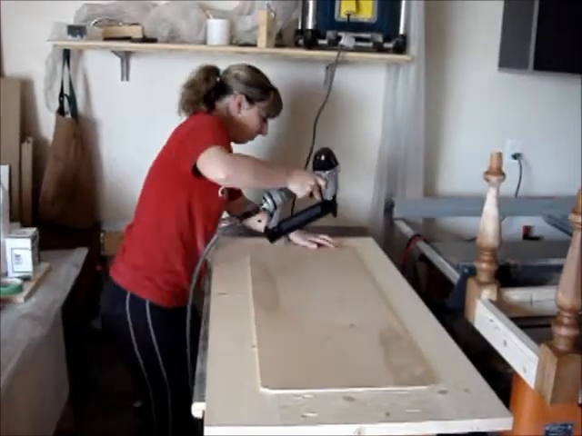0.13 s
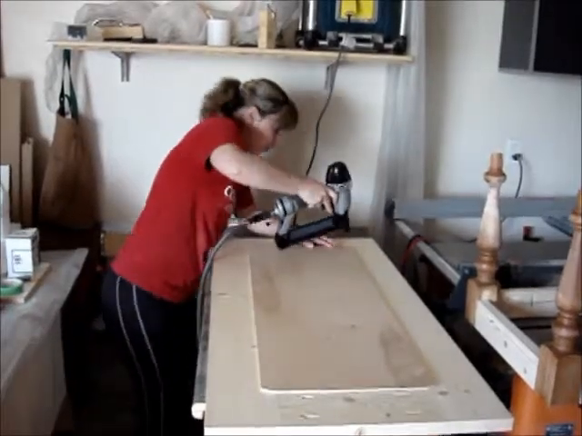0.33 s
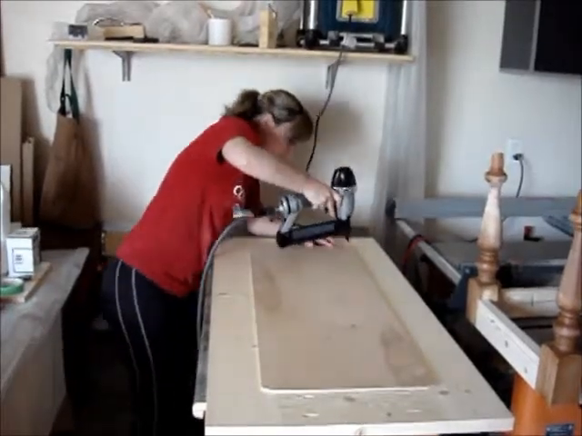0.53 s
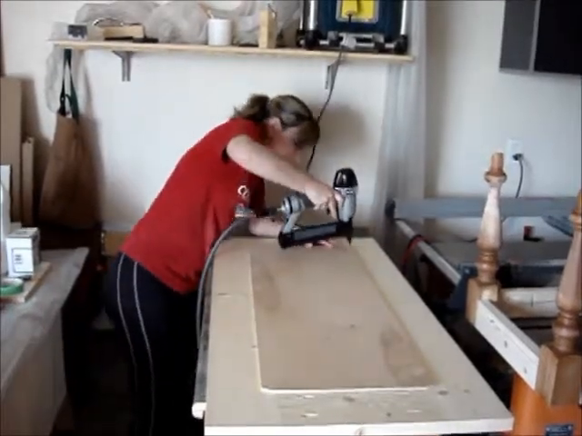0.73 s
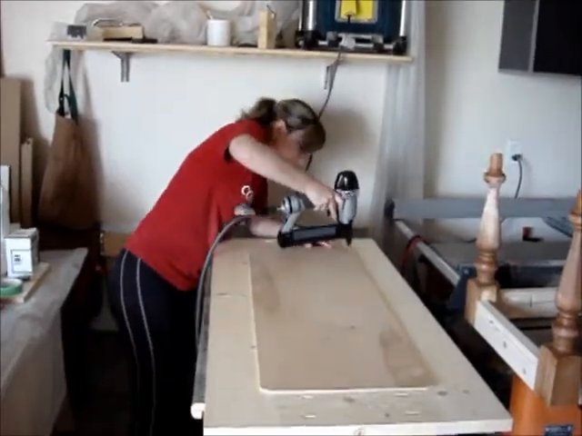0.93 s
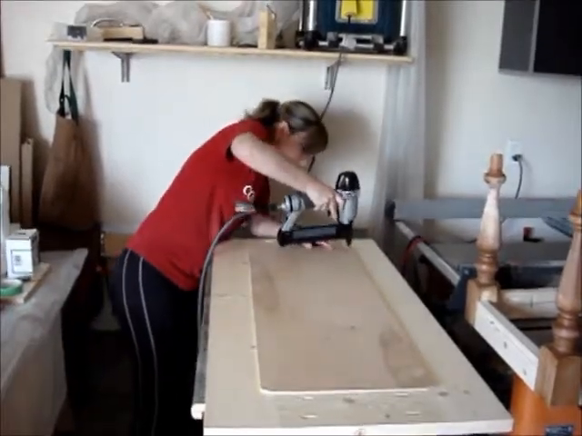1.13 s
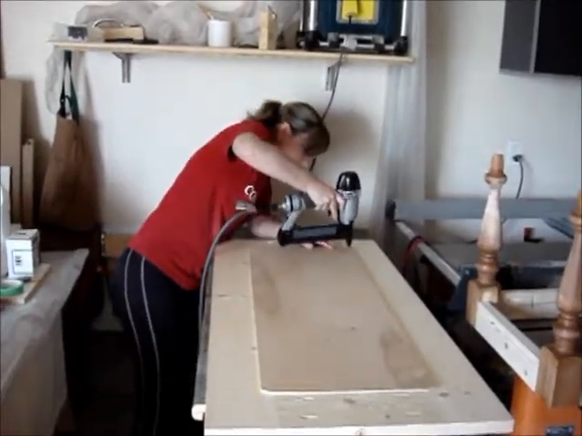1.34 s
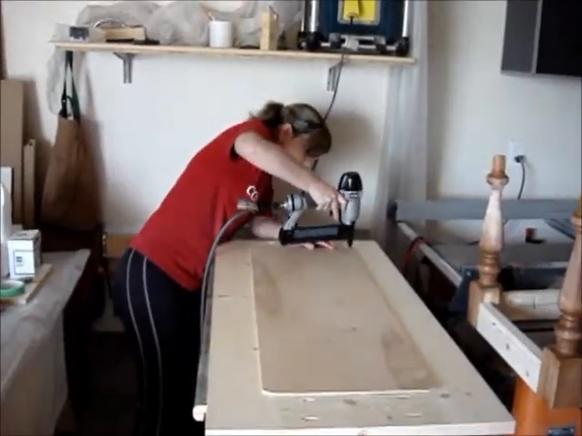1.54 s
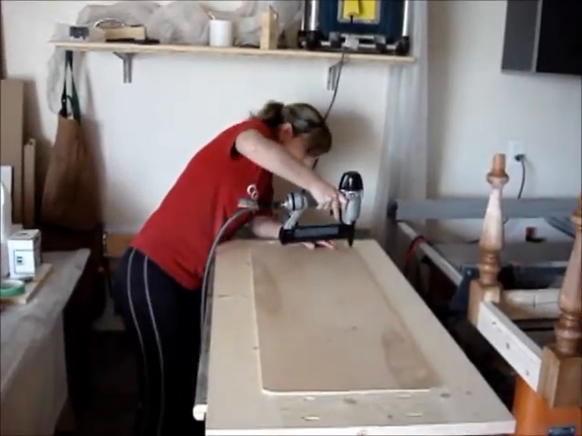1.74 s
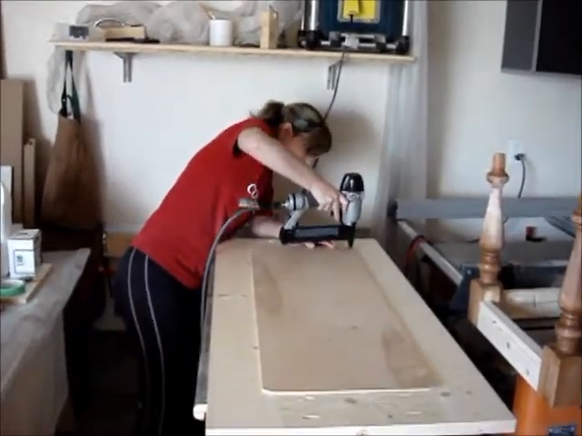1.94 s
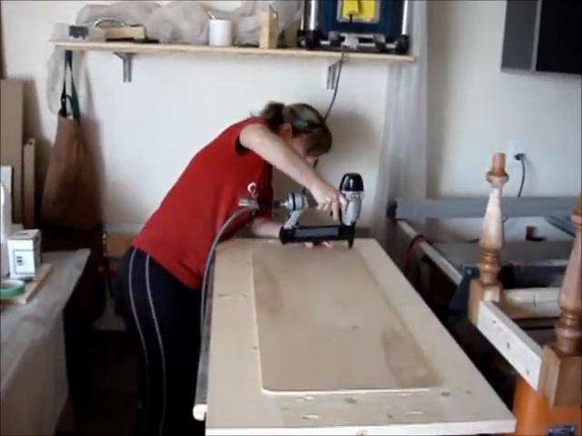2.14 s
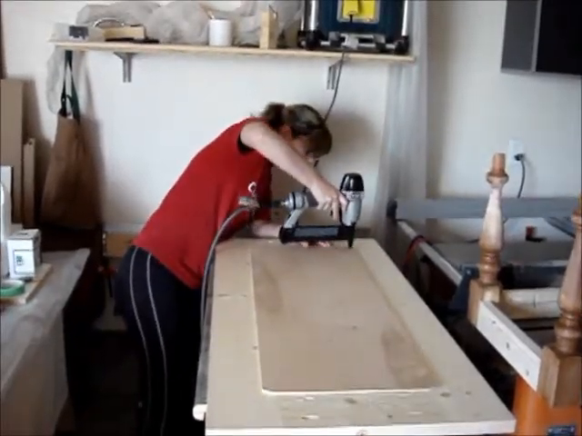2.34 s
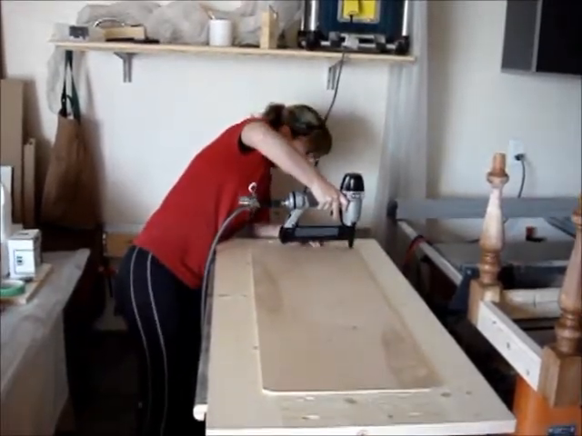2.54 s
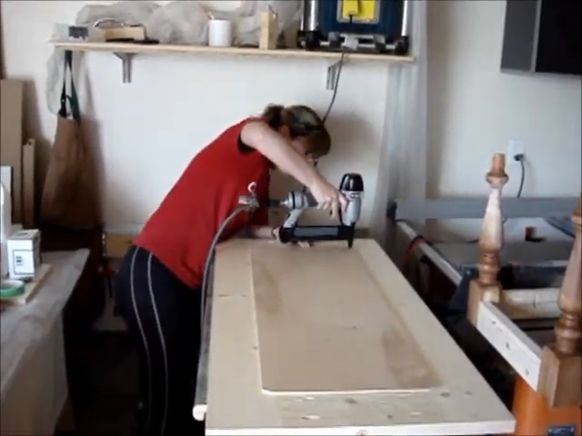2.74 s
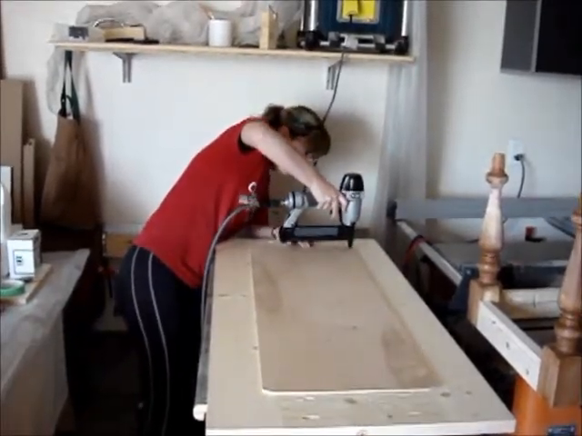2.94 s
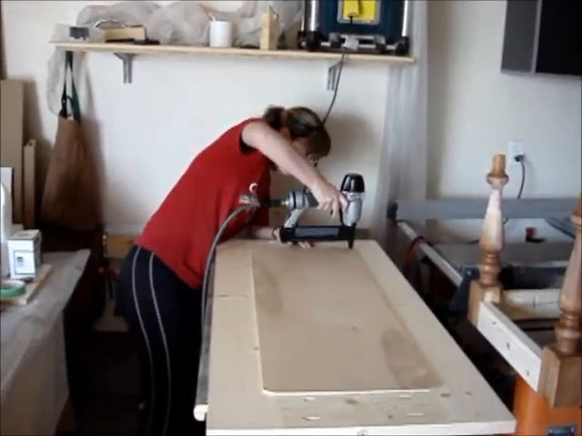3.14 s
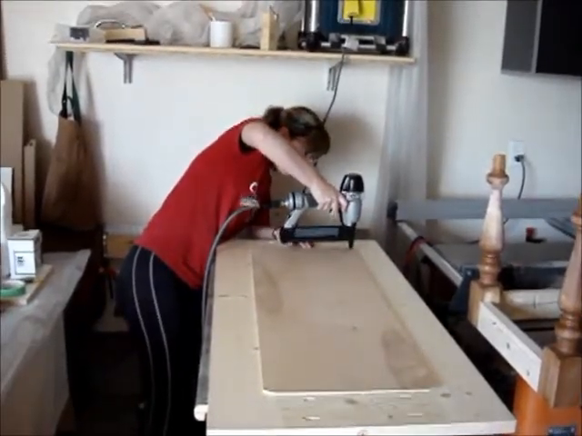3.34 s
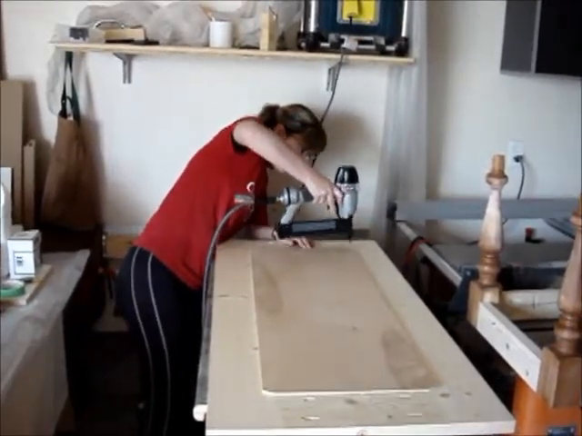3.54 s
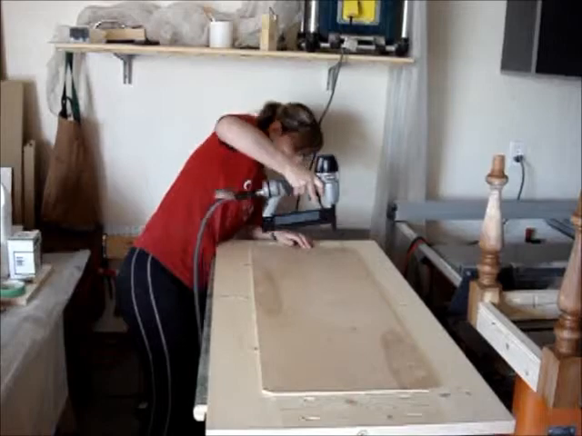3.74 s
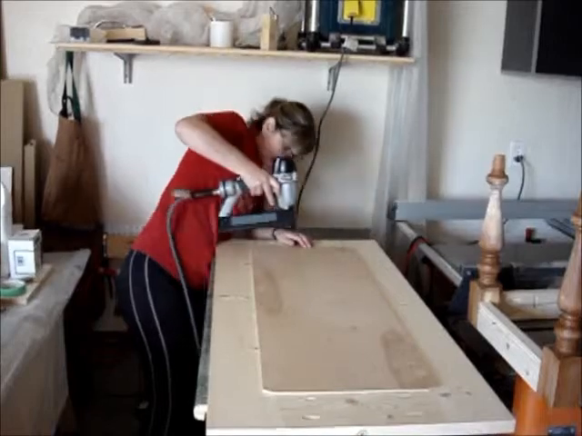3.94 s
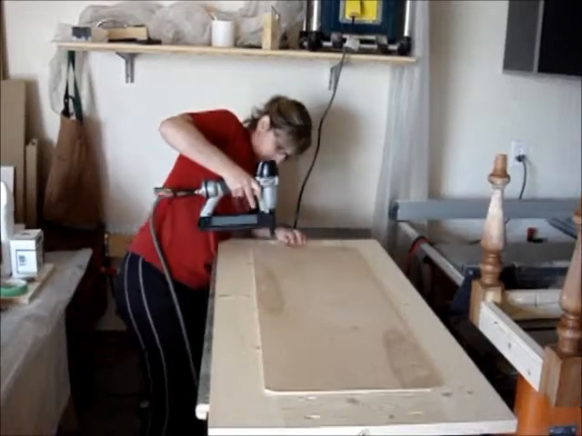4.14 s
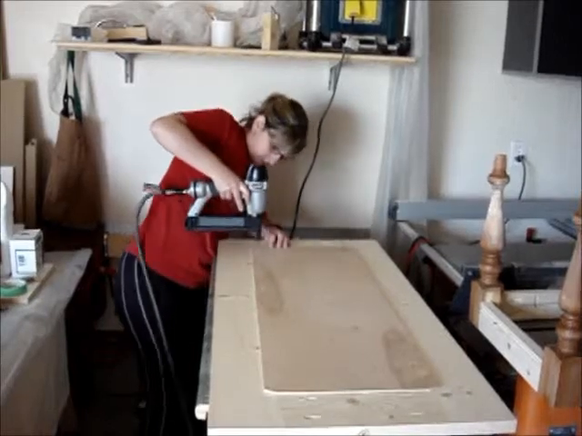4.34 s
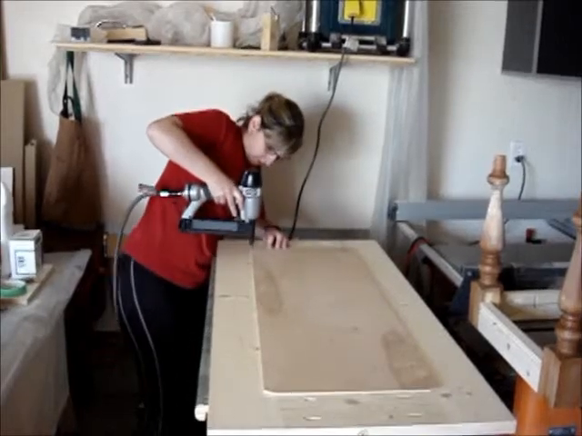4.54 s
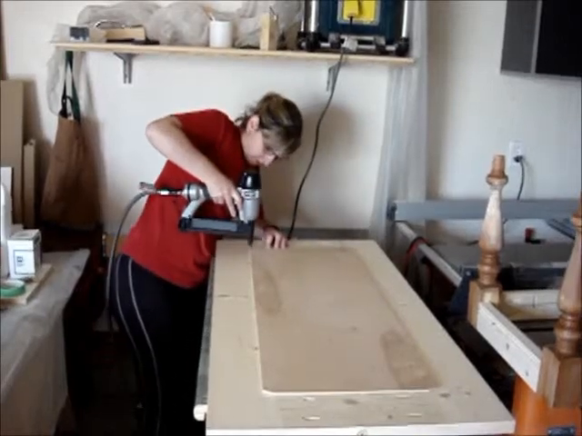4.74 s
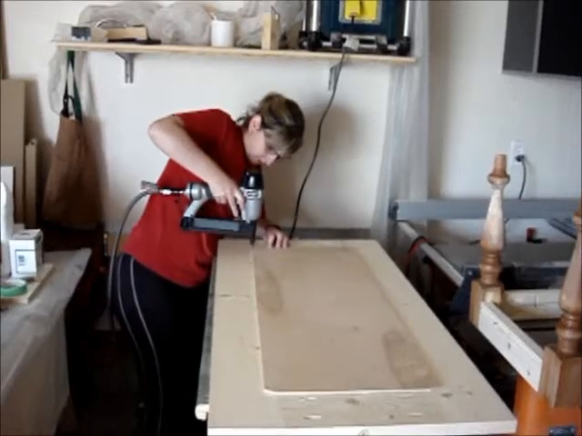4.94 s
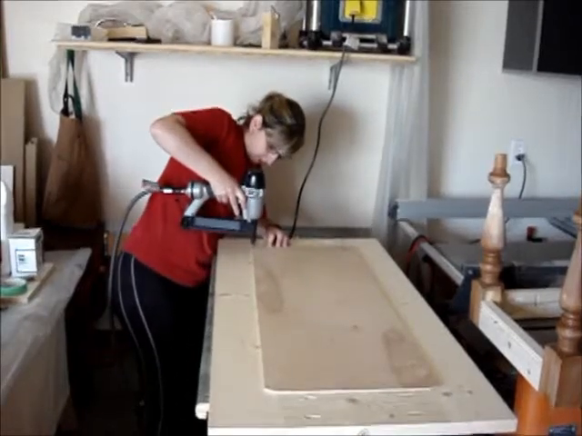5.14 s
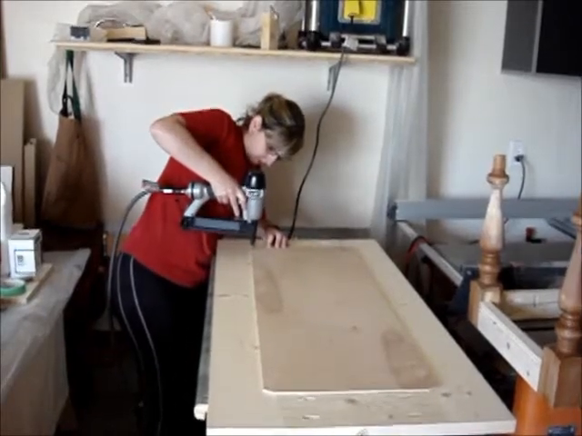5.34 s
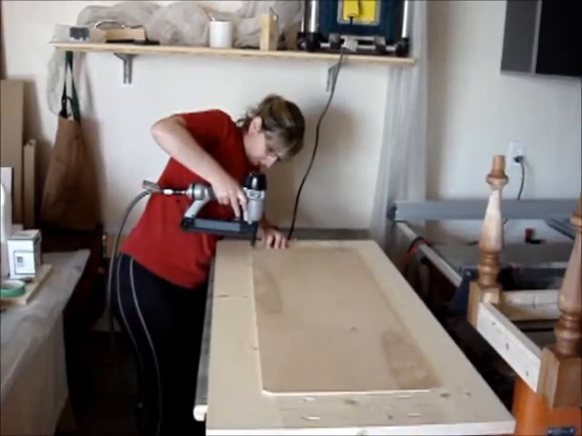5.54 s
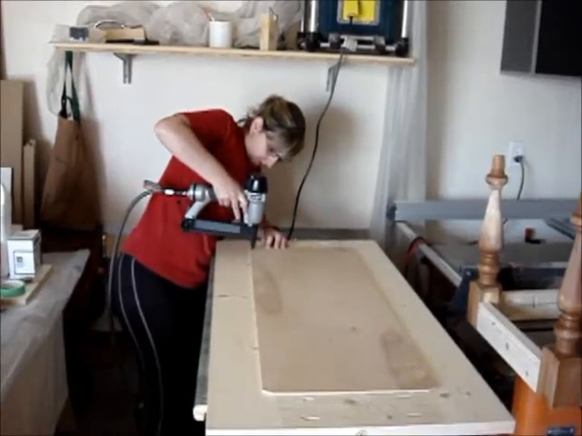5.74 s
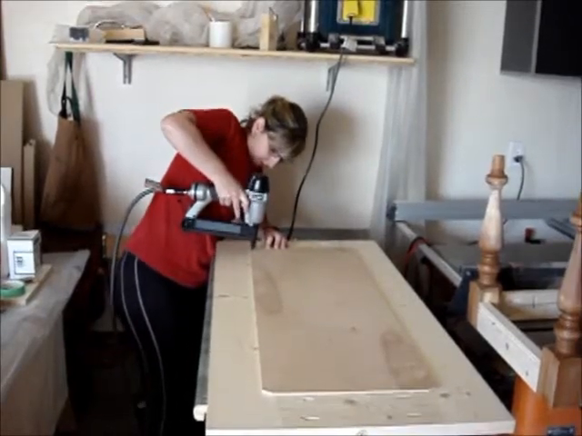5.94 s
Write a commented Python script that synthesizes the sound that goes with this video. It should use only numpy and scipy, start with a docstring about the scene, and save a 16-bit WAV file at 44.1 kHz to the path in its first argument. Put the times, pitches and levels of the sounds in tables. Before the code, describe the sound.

A small, bare, reflective workshop with soft steady room noise and faint, mains-buzzing hiss, heard through one microphone with a dull top end. From 0 to 0.9 s, sleeves and hose swish, a hand scuffs and briefly squeaks on wood, and dull knocks cluster. At 1.0 s loose metal parts of the stapler clack on the tabletop, with a weaker clack at 1.2 s. Sparse light bumps and scuffs come around 1.8-2.3 s, then quiet. At 3.33 s the trigger clicks with a short spit of air; at 3.39 s the driver slams in a single very loud, sharp crack with rapid recoil hits and an air burst. Wood, steel and room ring away by about 4 s; automatic gain ducks and slowly recovers. Low flutter follows, a small knock at 4.1 s, thin high ticking chatter around 4.6-5.2 s, and soft bumps and faint metal rattles at 5.7-5.9 s.

```python
"""In a small, bare workshop a pneumatic stapler is set down on a wooden tabletop and fired once.
Coloured noise makes the room floor, rustling sleeves, scuffs, knocks and the air spitting from the valve;
banks of dying modes make the clacking parts, the crack of the driver and the ring of tabletop and tool.
A decaying noise tail is the room. A gain control ducks at the shot and creeps back."""
import sys
import numpy as np
from scipy import signal
from scipy.io import wavfile
from scipy.ndimage import uniform_filter1d

SR = 44100
rng = np.random.default_rng(int(sys.argv[2]) if len(sys.argv) > 2 else 0)


def waveform_to_disk(signal):
    """Save audio, clipped to [-1, 1], as 16-bit WAV at the path in sys.argv[1]."""
    frames = np.transpose(np.atleast_2d(signal))
    scaled = np.clip(frames, -1, 1) * 32767
    samples = np.round(scaled).astype(np.int16)
    wavfile.write(sys.argv[1], SR, samples)


N = 264326
TIME = np.arange(N) / SR

# In all colours and mode banks the decibels are relative: each response is scaled to energy 1.
# steady room noise: pitch_hz, level_db
FLOOR_COLOUR = [(15, -57), (25, -29), (42, -15.5), (60, -12), (134, -2.5), (177, -8), (211, -3.5),
                (425, -6.5), (494, -5.5), (996, -2.5), (1160, -7.5), (1600, -10), (4480, -24.5),
                (7590, -22.5), (10000, -31.5), (13000, -69), (22000, -120)]
FLOOR_DB = -49.5
# how fast each band of the room dies: pitch_hz, t60_s
ROOM_T60 = [(120, 0.63), (400, 0.56), (1000, 0.71), (2500, 0.58), (5000, 0.62), (9000, 0.45)]
# spells of faint low flutter after the shot: start_s, length_s, level_db
FLUTTERS = [(3.48, 0.49, -44), (4.31, 0.65, -53)]
FLUTTER_ATTACK_S, FLUTTER_SAG_DB_PER_S, FLUTTER_RELEASE_DB_PER_S = .025, 6, 122
# spectrum of the flutter: pitch_hz, level_db
FLUTTER_COLOUR = [(10, 12), (30, -13), (60, -5.5), (130, -28), (400, -55)]
MAINS_HZ, EDGE_HZ = 60, 10080  # pace of the buzz in the hiss, upper band limit

# runs of thin high chatter: middle_s, width_s, level_db of one tick
CHATTER_RUNS = [(4.71, .065, -27), (4.89, .05, -33), (5.15, .03, -26)]
# tones of one chatter tick: pitch_hz, level_db, t60_s
CHATTER_TONES = [(4300, 1, 0.012), (4700, 0, 0.01), (6000, 0, .009)]
CHATTER_FROM_S, CHATTER_TO_S, CHATTER_PER_S = 4.4, 5.1605, 60

# Levels of knocks, bumps, scuffs, swishes, squeaks and clacks are relative: one trim follows on each mix.
# swishes of sleeve and hose as the arm reaches out: middle_s, width_s, level_db
SWISHES = [(.075, 0.02, -36), (.205, 0.03, -42.5), (.37, .05, -49), (.545, 0.042, -46.5),
           (.82, 0.11, -41.5)]
# spectrum of rustling cloth: pitch_hz, level_db
CLOTH_COLOUR = [(350, -18), (600, -25), (1040, 2), (1130, 0), (1230, -0.5), (1950, -1), (2460, 2),
                (6860, -3), (10000, -18), (13000, -51), (22000, -120)]
# tool and hand scuffing over the wood: start_s, length_s, level_db
SCUFFS = [(0, 0.11, -45.5), (.245, 0.016, -46), (.345, 0.068, -46), (.53, 0.27, -48.5), (.775, .05, -38),
          (1.915, 0.069, -50.5), (2.17, 0.22, -53), (4.095, 0.022, -41), (5.735, 0.016, -49)]
SCUFF_ATTACK_S, SCUFF_SAG_DB_PER_S, SCUFF_RELEASE_DB_PER_S = 0.0099, 6, 204
# spectrum of the scuffing: pitch_hz, level_db
SCUFF_COLOUR = [(60, -14.5), (160, -0.5), (330, 0), (520, 1), (740, 4.5), (1000, -3.5), (1600, -20),
                (4000, -66)]
# the hand squeaking faintly as it slides: start_s, length_s, level_db
SQUEAKS = [(.245, 0.017, -40), (.315, .11, -47)]
# the resonance the squeaks catch on: pitch_hz, level_db, t60_s
SQUEAK_TONE = [(741, 0, 0.039)]
# dull bumps against the bench: start_s, pitch_hz, level_db
BUMPS = [(0.002, 160, -42), (2.013, 240, -40), (2.092, 205, -37), (2.125, 235, -43), (4.985, 322, -43),
         (5.765, 335, -43), (5.8, 345, -43), (5.893, 295, -33.5), (5.928, 270, -41)]
BUMP_T60_S, BUMP_RISE_S, BUMP_THUD_DB = 0.097, .004, -5  # the thud is relative to the bump's note
# hand and tool knocking on the wood: start_s, thud_db, tick_above_thud_db (the dry contact)
KNOCKS = [(0.002, -37, -20), (0.252, -39, -13), (0.342, -40, -13), (0.413, -32.5, -26), (0.446, -42, -23),
          (0.546, -33, -5), (0.77, -36, -3.5), (0.787, -36, -5), (0.856, -36, -12), (1.005, -45, 0.5),
          (1.085, -45, 5), (1.921, -41.5, -1), (2.075, -35, -8), (4.094, -38.5, -8), (4.135, -42, -13),
          (5.732, -40.5, -6)]
# dull part of a contact with the wood: pitch_hz, level_db
THUD_COLOUR = [(40, -38), (110, -7), (170, -1), (280, 5.5), (480, -0.5), (780, -5), (1200, -6.5),
               (2200, -14.5), (6000, -53)]
# dry part of a contact: pitch_hz, level_db
TICK_COLOUR = [(200, -6.5), (700, 3.5), (1500, 6), (3500, 5), (6500, -0.5), (10000, -15)]
# loose metal parts clacking as the stapler is set down and tilted: start_s, level_db
CLACKS = [(1.011, -29), (1.035, -29.5), (1.039, -32), (1.2, -38.5), (1.775, -48.5), (4.792, -47),
          (5.732, -49), (5.87, -49), (5.888, -44), (5.93, -45)]
CLACK_THUD_DB, CLACK_TICK_DB = -8, -6  # added to the clack level for its thud and tick
# modes of the loose nose piece and magazine: pitch_hz, level_db, t60_s
CLACK_MODES = [(1050, -10, .014), (1560, -7, .024), (2150, -8, .008), (2780, 0, .028), (2910, 0, .028),
               (3550, -4, .012)]

# low pushes at the start of the shot and at the blow: start_s, signed height (linear), decay_s (to 1/e)
PUSHES = [(3.334, 0.043, 0.028), (3.3886, -0.071, 0.043)]
# air leaving the valve, one jet before the blow and one around it: start_s, length_s, flow_db
JETS = [(3.324, .064, -20.5), (3.387, .11, -8.5)]
JET_ATTACK_S, JET_SAG_DB_PER_S, JET_RELEASE_DB_PER_S = .011, 63, 200
# spectrum of the escaping air: pitch_hz, level_db
AIR_COLOUR = [(88, -60), (150, -11), (287, -23), (513, -39), (668, -28), (839, -48), (1000, -34),
              (1420, -11), (1950, -11), (2630, 4.5), (3940, -3), (7420, 1.5), (10000, -6), (13000, -55),
              (22000, -120)]
# the driver's blows and the recoil of the tool: start_s, relative force_db
BLOWS = [(3.3904, -13), (3.393, -1), (3.3965, -12), (3.4, -3.5), (3.4120, -9), (3.4223, -2.5)]
# spectrum of the burst and its room echo: pitch_hz, level_db
BLOW_COLOUR = [(35, -70), (60, -48), (203, -17.5), (236, -16.5), (319, -15.5), (412, -12), (458, -16),
               (499, -9.5), (646, -9), (1080, -6.5), (1310, -8), (2600, -2), (3900, -11.5), (8250, -20.5),
               (10000, -33), (13000, -53), (22000, -120)]
SLAM_AT_S = 3.3915  # the piston hits its stop
# heavily damped modes of the nose pressed into the wood: pitch_hz, level_db, t60_s
NOSE_MODES = [(560, -26, 0.037), (910, -2, .022), (1051, 10.5, 0.044), (1454, 4.5, 0.029),
              (2010, -16, .012), (2880, 8.5, 0.018), (3100, -10, .01), (4400, 8, .006), (7540, 4, .005)]
# modes of the tabletop: pitch_hz, level_db, t60_s
TABLE_MODES = [(238, -7, .5), (502, -2, .45), (686, -2, .42), (843, 1, .45), (990, -1, .4), (1059, 1, .45),
               (1388, -2, .45), (1502, -1, .55), (1657, -2, .45)]
# modes of the stapler's metal body: pitch_hz, level_db, t60_s
STEEL_MODES = [(2132, -3, .5), (2181, -4, .5), (2433, -3, .5), (2532, 0, .45), (2570, 0, .45),
               (2628, -2, .5), (2657, -2, .55), (2923, -2, .45), (2967, 0, .45), (3478, -7, .36),
               (5884, -9, .3), (7736, -9, .28)]


def amp(db):
    """Decibels to gain."""
    return 10 ** (np.asarray(db) / 20)


def evened(x):
    """Scales to rms 1."""
    return x / np.sqrt(np.mean(x ** 2) + 1e-20)


def read(points, hz):
    """Reads a table by pitch, on a log-frequency axis."""
    f, value = np.transpose(points)
    return np.interp(np.log(hz + 1), np.log(f + 1), value)


def through(x, response):
    """Plays x through an impulse response."""
    return signal.oaconvolve(x, response)[:N]


def colour(points, size=4096):
    """Causal (minimum-phase) impulse response of energy 1 with the given spectrum."""
    log_gain = np.log(amp(read(points, abs(np.fft.fftfreq(size, 1 / SR)))))
    spectrum = np.exp(np.conj(signal.hilbert(log_gain)))
    response = np.fft.ifft(spectrum).real[:size // 2]
    return response / np.linalg.norm(response)


def ring(modes):
    """Impulse response of energy 1: sines that each die at their own speed."""
    t = TIME[:SR]
    response = np.zeros(len(t))
    for hz, db, t60 in modes:
        decay = np.exp(-np.log(1000) * t / t60)
        response += amp(db) * decay * np.sin(2 * np.pi * hz * t)
    return response / np.linalg.norm(response)


def clicks(times, db):
    """Single impulses of the given sizes."""
    return np.bincount(np.round(np.asarray(times) * SR).astype(int), amp(db), N)


def strikes(times, db, contact):
    """Rough contacts: noise bursts start at the given level and fall to 1/e in the contact time (s)."""
    out = np.zeros(N)
    t = TIME[:SR // 8]
    for s, gain in zip(times, amp(db)):
        part = out[max(round(s * SR), 0):][:len(t)]
        burst = gain * np.exp(-t / contact) * rng.standard_normal(len(t))
        part += burst[:len(part)]
    return out


def grains(per_s, spread_db):
    """Random slips of uneven size, rms 1."""
    slips = rng.random(N) < per_s / SR
    size_db = spread_db * np.minimum(rng.exponential(1, N), 3)
    return evened(slips * rng.standard_normal(N) * amp(size_db))


def strokes(rows, attack_s, sag_db_per_s, release_db_per_s):
    """Gain over time: each row rises, sags while it lasts, then is released."""
    out = np.zeros(N)
    for start, length, db in rows:
        t = np.maximum(TIME - start, 0)
        fall_db = sag_db_per_s * t + release_db_per_s * np.maximum(t - length, 0)
        out += np.minimum(t / attack_s, 1) * amp(db - fall_db)
    return out


def swells(rows):
    """Gain over time: each row is a bell that swells and fades evenly."""
    out = np.zeros(N)
    for middle, width, db in rows:
        out += amp(db) / np.cosh(np.minimum(abs(TIME - middle) / width, 20))
    return out


def room(build=.05, early=.6, size=256):
    """Noise tail of energy 1: thickens from the early share over the build time (s); each band dies alone."""
    hz, t, z = signal.stft(rng.standard_normal(SR + SR // 4), SR, nperseg=size)
    decay = np.exp(-np.log(1000) * t / read(ROOM_T60, hz)[:, None])
    thickening = 1 - (1 - early) * np.exp(-(t / build) ** 2)
    tail = signal.istft(z * decay * thickening, SR, nperseg=size)[1]
    return tail / np.linalg.norm(tail)


def background():
    """Steady coloured noise of the room, and low flutter as noise in slow strokes."""
    air = amp(FLOOR_DB) * through(rng.standard_normal(N), colour(FLOOR_COLOUR))
    flutter = strokes(FLUTTERS, FLUTTER_ATTACK_S, FLUTTER_SAG_DB_PER_S, FLUTTER_RELEASE_DB_PER_S)
    return air + flutter * through(rng.standard_normal(N), colour(FLUTTER_COLOUR))


def sputter(dying):
    """Noise that flares once in each mains cycle and falls to 1/e in the dying time (s), rms 1."""
    return evened(np.exp(-(TIME % (1 / MAINS_HZ)) / dying) * rng.standard_normal(N))


def circuit_hiss(buzz_db=-58.5):
    """The electronics' faint hiss, buzzing with the mains."""
    hiss_colour = colour([(1500, -17), (4500, -6.5), (7500, -16.0), (10000, -16.5), (12000, -15.5)])
    return amp(buzz_db) * through(sputter(dying=0.017), hiss_colour)


def chatter(uneven_db=1, last_db=7):
    """An even train of tiny ticks on a few high tones; it swells in runs, and its last tick is boosted."""
    at = np.arange(CHATTER_TO_S, CHATTER_FROM_S, -1 / CHATTER_PER_S)  # counted back from the last tick
    db = uneven_db * rng.standard_normal(len(at)) + last_db * (at == CHATTER_TO_S)
    return through(swells(CHATTER_RUNS) * clicks(at, db), ring(CHATTER_TONES))


def squeaks(attack_s=.008, sag_db_per_s=5, release_db_per_s=400):
    """Quick slips that catch on one narrow resonance."""
    sliding = strokes(SQUEAKS, attack_s, sag_db_per_s, release_db_per_s)
    return through(sliding * grains(per_s=1400, spread_db=0.5), ring(SQUEAK_TONE))


def bumps():
    """Soft, heavy contacts: each a low note that dies quickly, with a noisy thud."""
    out = np.zeros(N)
    for s, hz, db in BUMPS:
        t = np.maximum(TIME - s, 0)
        envelope = np.minimum(t / BUMP_RISE_S, 1) * np.exp(-np.log(1000) * t / BUMP_T60_S)
        out += amp(db) * envelope * np.sin(2 * np.pi * hz * t)
    at, _, db = np.transpose(BUMPS)
    return out + through(strikes(at, db + BUMP_THUD_DB, contact=0.019), colour(THUD_COLOUR))


def handling(thud_s=0.013, tick_s=0.01, room_db=-3, trim_db=-0.5):
    """Hand and tool on wood: noise bursts knock, random slips scuff and rustle, and the room answers."""
    knock_at, knock_db, hardness_db = np.transpose(KNOCKS)
    clack_at, clack_db = np.transpose(CLACKS)
    at = np.r_[knock_at, clack_at]
    thuds = strikes(at, np.r_[knock_db, clack_db + CLACK_THUD_DB], thud_s)
    ticks = strikes(at, np.r_[knock_db + hardness_db, clack_db + CLACK_TICK_DB], tick_s)
    scuffing = strokes(SCUFFS, SCUFF_ATTACK_S, SCUFF_SAG_DB_PER_S, SCUFF_RELEASE_DB_PER_S)
    near = through(thuds, colour(THUD_COLOUR)) + through(ticks, colour(TICK_COLOUR)) + bumps() + squeaks()
    near += through(scuffing * grains(per_s=1100, spread_db=-2.0), colour(SCUFF_COLOUR))
    near += through(swells(SWISHES) * grains(per_s=6000, spread_db=2), colour(CLOTH_COLOUR))
    return amp(trim_db) * (near + amp(room_db) * through(near, room(build=0.028, early=1.0)))


def clacks(contact_s=0.0074, room_db=-6, trim_db=-1):
    """Loose metal parts ring briefly when rough contacts excite their modes."""
    near = through(strikes(*np.transpose(CLACKS), contact_s), ring(CLACK_MODES))
    return amp(trim_db) * (near + amp(room_db) * through(near, room(build=0.028, early=1.0)))


def trigger(at=3.3315, clunk_db=-4, tick_db=-25, tick_s=.006):
    """The trigger: a dry tick and a short clunk through the damped modes of the nose."""
    clunk = through(clicks([at], [clunk_db]), ring(NOSE_MODES))
    return clunk + through(strikes([at], [tick_db], tick_s), colour(TICK_COLOUR))


def pushes(rise=0.00047):
    """Low steps that rise fast and die away."""
    out = np.zeros(N)
    for s, height, dying in PUSHES:
        t = np.maximum(TIME - s, 0)
        out += height * (1 - np.exp(-t / rise)) * np.exp(-t / dying)
    return out


def exhaust(room_db=-3, snap_at=3.3325, snap_db=-14):
    """Two jets of turbulent noise, one before the blow and one around it; a short snap falls in the first."""
    flow = strokes(JETS, JET_ATTACK_S, JET_SAG_DB_PER_S, JET_RELEASE_DB_PER_S) * rng.standard_normal(N)
    snap = strikes([snap_at], [snap_db], contact=0.0017)
    jet = through(flow + snap, colour(AIR_COLOUR))
    return jet + amp(room_db) * through(jet, room(build=.05, early=1.0))


def shot(crack_db=27, burst_db=-1, burst_s=0.008, room_db=34, table_db=25, steel_db=27.5, low_hz=300):
    """The piston slams down and the driver cracks into the wood; tabletop, tool and room ring on."""
    crack = amp(crack_db) * through(clicks(*np.transpose(BLOWS)), ring(NOSE_MODES))
    # keeps the low end out of the crack
    crack = signal.sosfilt(signal.butter(2, low_hz, "high", fs=SR, output="sos"), crack)
    slam = clicks([SLAM_AT_S], [0])
    burst = strikes([SLAM_AT_S], [burst_db], burst_s)  # fibres split under the staple
    echo = amp(room_db) * through(slam, room(build=0.079, early=0.61))
    body = amp(table_db) * ring(TABLE_MODES) + amp(steel_db) * ring(STEEL_MODES)
    return crack + through(burst + echo, colour(BLOW_COLOUR)) + through(slam, body)


def scene():
    """Everything summed at one microphone."""
    placing = background() + chatter() + handling() + clacks()
    firing = trigger() + pushes() + exhaust() + shot()
    return (placing + firing)[None]


def record(dry, threshold_db=-16, share=0.65, recover_db_per_s=12, size=200):
    """Gain control ducks a share of the excess level and creeps back; peaks round off, then the band limit."""
    power_db = 10 * np.log10(abs(uniform_filter1d(dry[0] ** 2, size)) + 1e-12)
    recovery = TIME * recover_db_per_s
    wanted_db = share * np.maximum(power_db - threshold_db, 0)
    duck_db = np.maximum.accumulate(wanted_db + recovery) - recovery  # instant duck, steady recovery
    glide_db = uniform_filter1d(duck_db, size, origin=size // 2 - 1)  # the gain lags by a short average
    ducked = dry * amp(-glide_db) + circuit_hiss()
    rounded = ducked / (1 + (ducked / .9) ** 4) ** .25
    low_pass = signal.firwin(801, EDGE_HZ, window=("kaiser", 9), fs=SR)
    return signal.oaconvolve(rounded, low_pass[None], "same")


dry = scene()
out = record(dry)
waveform_to_disk(out)
```